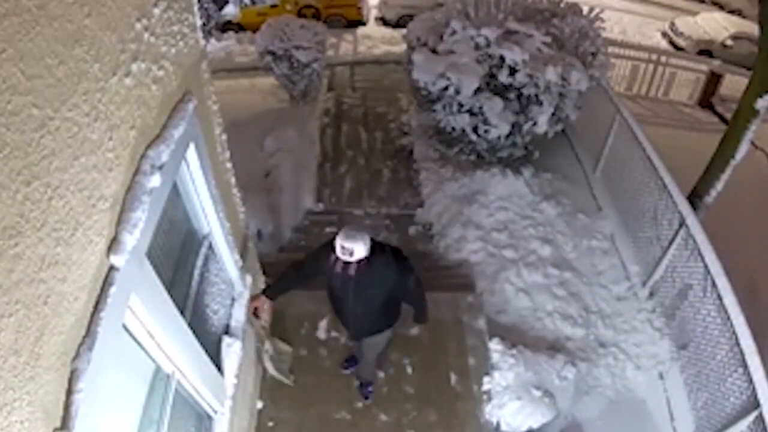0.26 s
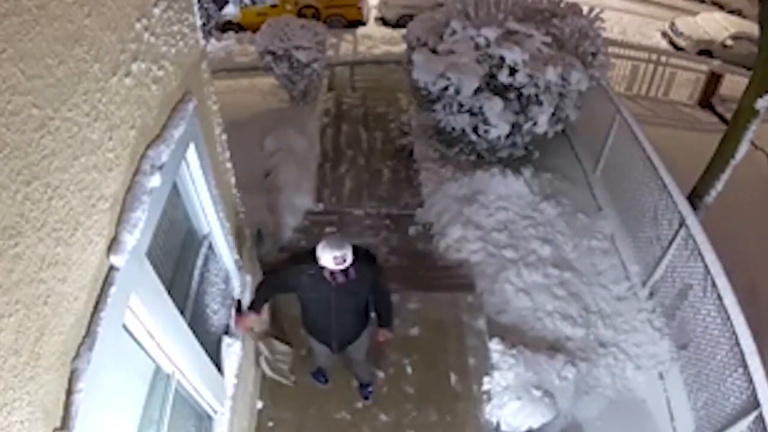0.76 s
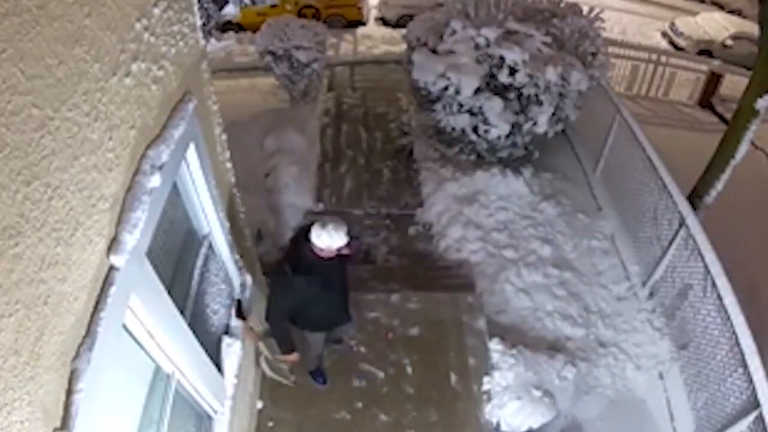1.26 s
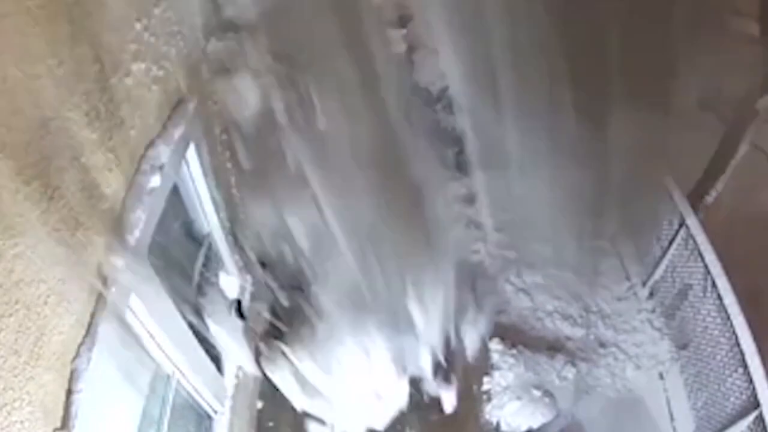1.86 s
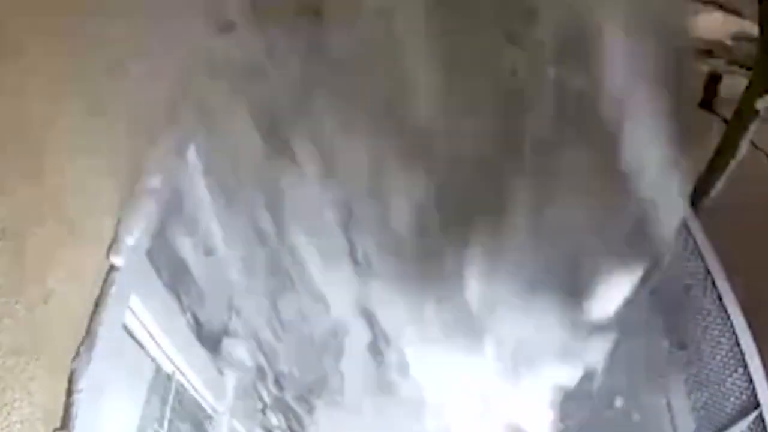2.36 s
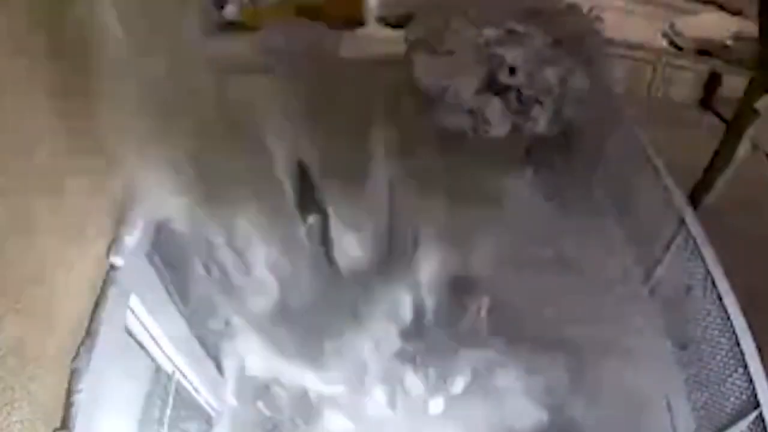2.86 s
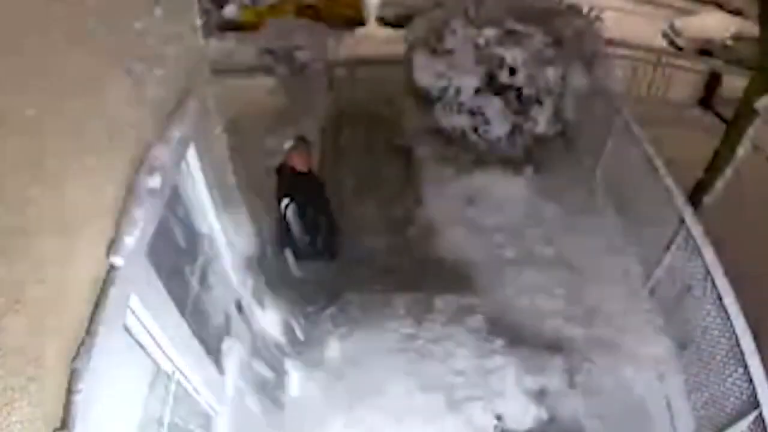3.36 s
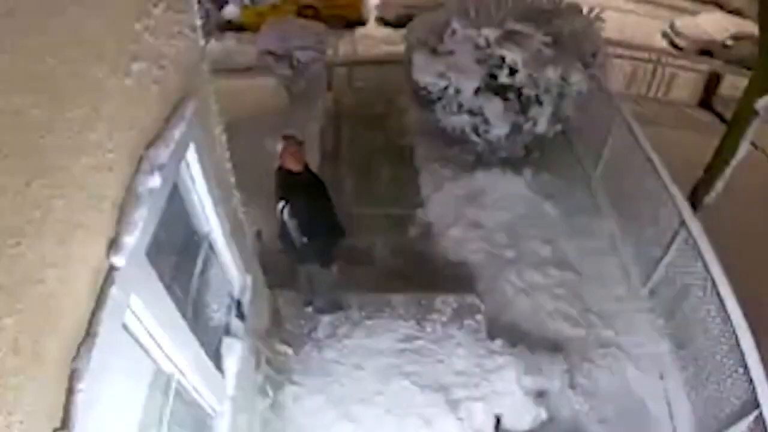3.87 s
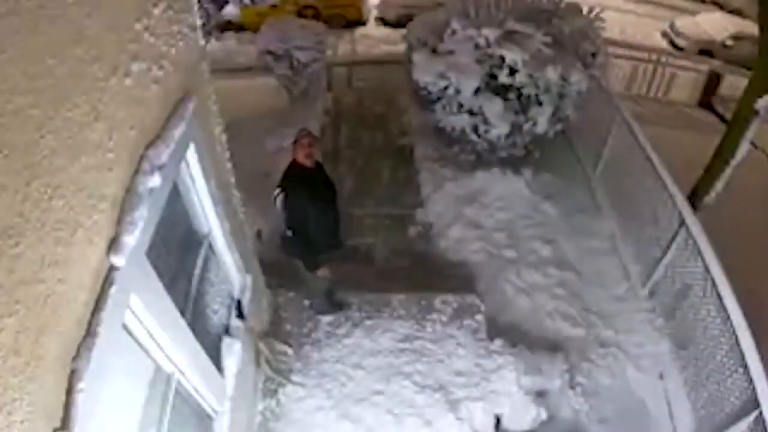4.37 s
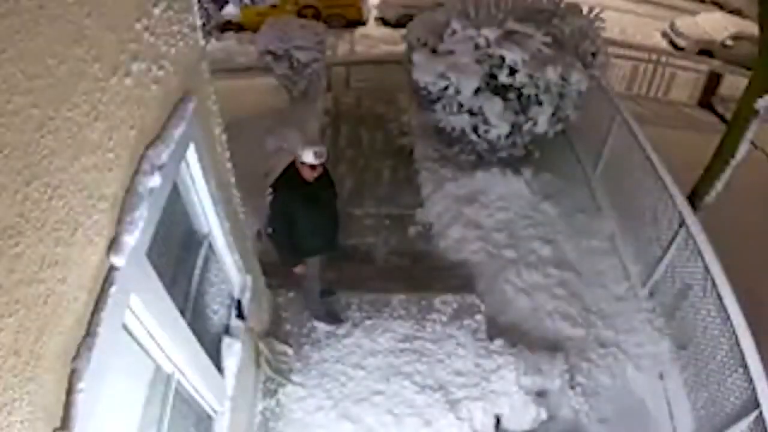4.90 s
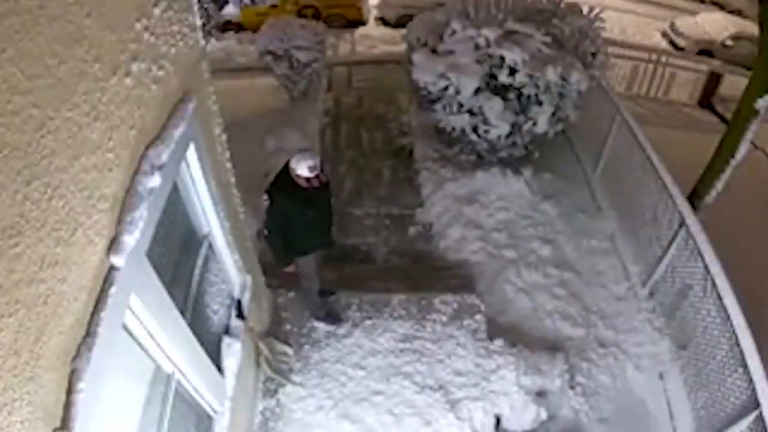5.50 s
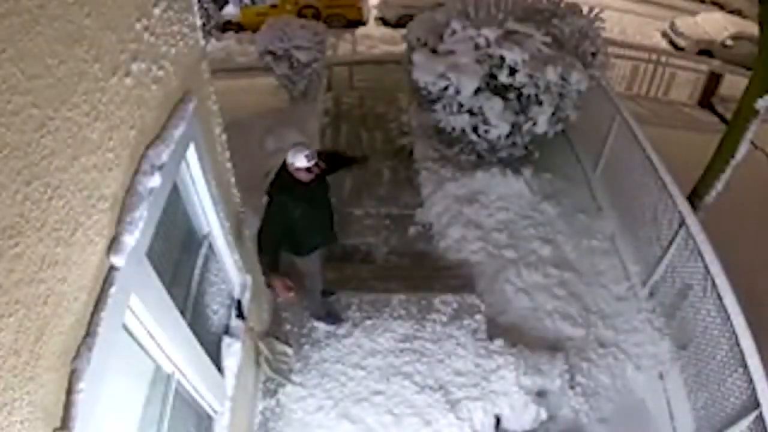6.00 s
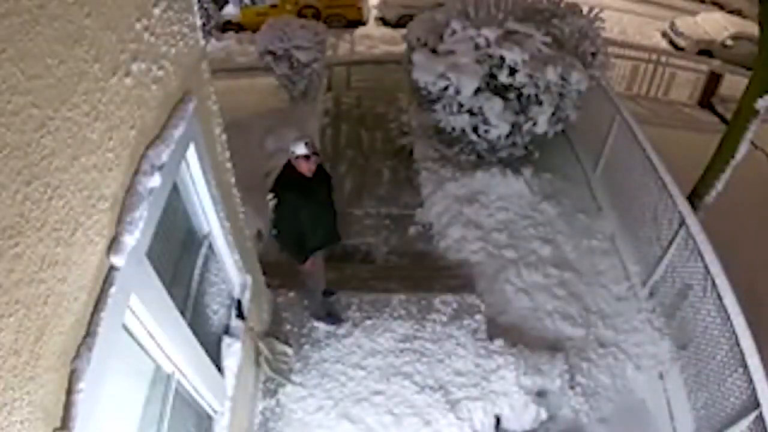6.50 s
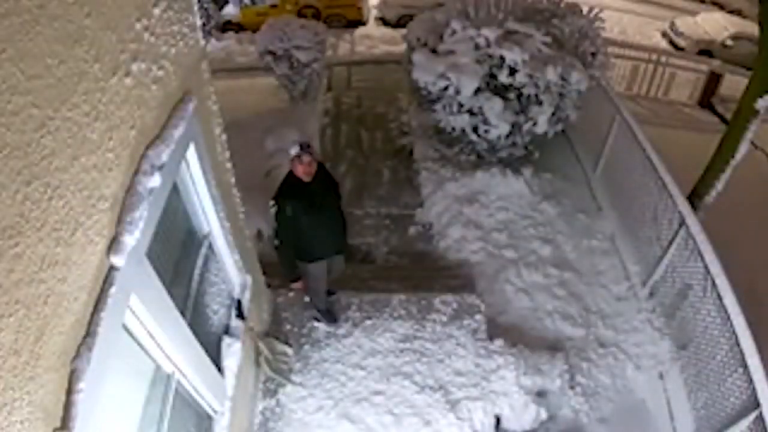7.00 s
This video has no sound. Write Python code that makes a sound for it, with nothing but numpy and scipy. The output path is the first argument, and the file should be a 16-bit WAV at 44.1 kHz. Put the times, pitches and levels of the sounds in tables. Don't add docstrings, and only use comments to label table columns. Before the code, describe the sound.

Hollow knocks and gritty scuffs on a concrete doorstep, drips ticking on metal, then roof snow crashes down in rumbling thuds and hissing powder.

```python
import sys
import numpy as np
from scipy import signal
from scipy.fft import rfft, irfft
from scipy.io import wavfile
from scipy.ndimage import uniform_filter1d

SR = 44100
rng = np.random.default_rng(int(sys.argv[2]) if len(sys.argv) > 2 else 0)


def digitize_waveform(pressure):
    field = np.atleast_2d(pressure).T
    bounded = np.clip(field, -1, 1)
    quanta = np.round(bounded * 32767).astype(np.int16)
    wavfile.write(sys.argv[1], SR, quanta)


def invert_db(x):
    u = np.asarray(x, float) / 20
    return 10 ** u


N = 319725
HIT_N = 6000

# (time [s], level [dB])
SNOW_FLOW = [
    (1.95, -34),
    (2.09, -7),
    (2.22, -2),
    (2.68, 0.5),
    (3.15, -5.5),
    (3.33, -10),
    (3.39, -14.5),
    (3.74, -20),
    (4.15, -23),
]
# (frequency [Hz], level [dB per Hz])
POWDER_COLOUR = [(380, -8), (758, 0.5), (1110, -6), (4320, -12), (7990, -7), (9540, -9), (11000, -22),
                 (14300, -56)]


def unit(x):
    return x / np.sqrt(np.mean(x ** 2))


def colour(x, shape):
    hz, db = np.transpose(shape)
    log_f = np.log(np.fft.rfftfreq(len(x), 1 / SR) + 1)
    curve = invert_db(np.interp(log_f, np.log(hz), db, left=-90, right=-90))
    return unit(irfft(rfft(x) * curve, len(x)))


def patchy(shape, spread_db):
    hz, db = np.transpose(shape)
    fine = np.geomspace(hz[0], hz[-1], num=24)
    smooth = np.interp(np.log(fine), np.log(hz), db)
    return np.transpose([fine, smooth + spread_db * rng.standard_normal(len(fine))])


def band(x, hz, width_hz):
    return signal.lfilter(*signal.iirpeak(hz, hz / width_hz, fs=SR), x)


def resonances(x, modes):
    return sum(invert_db(db) * unit(band(x, hz, width_hz)) for hz, width_hz, db in modes)


def walk(rate):
    k = int(SR / rate)
    steps = np.repeat(rng.standard_normal(N // k + 1), k)
    return 1.3 * uniform_filter1d(uniform_filter1d(steps, k), k)[:N]


def grit(rate, spread_db):
    hits = (rng.random(N) < rate / SR) * invert_db(spread_db * rng.exponential(size=N))
    grains = signal.lfilter([1], [1, -np.exp(-1 / (.002 * SR))], hits)
    return unit((unit(grains) + 1.02) * rng.standard_normal(N))


def fader(table):
    s, db = np.transpose(table)
    gain = np.interp(np.arange(N) / SR, s, invert_db(db), left=0, right=0)
    return uniform_filter1d(gain, size=1500, mode="nearest")


def add(out, s, x):
    i = int(max(s, 0) * SR)
    out[i:i + len(x)] += x[:N - i]


def decay(t60, rise_s):
    t = np.arange(HIT_N) / SR
    return 1000. ** (-t / t60) * (1 - np.exp(-t / rise_s))


def ring(hz, t60, rise_s):
    return np.sin(2 * np.pi * hz * np.arange(HIT_N) / SR) * decay(t60, rise_s)


def burst(t60, rise_s, shape):
    return colour(rng.standard_normal(HIT_N), patchy(shape, 3.2)) * decay(t60, rise_s)


def boot_knocks():
    # (time [s], peak [dB], pitch [Hz], crunch [dB], crunch centre [Hz])
    knock_events = [(.334, -20, 267, -6.5, 2100), (0.344, -21, 297, -7, 6060), (.378, -33.5, 445, -10, 890),
                    (0.417, -45.5, 417, 16.5, 3800), (0.423, -38, 310, 1, 1620),
                    (0.651, -23.5, 295, -10, 2000), (0.67, -31.5, 263, -18, 700),
                    (1.576, -10, 312, -14, 1070), (1.5893, -6.5, 194, -24, 1500),
                    (1.79, -47.5, 634, 0, 2530), (2.016, -31, 228, -20, 2500),
                    (2.027, -40.5, 540, 12, 1110), (2.132, -11.5, 154, -31, 910),
                    (2.139, -40, 565, 5.5, 920), (2.198, -35, 650, -2.5, 850), (3.959, -42, 324, -4, 377),
                    (5.912, -45, 119, -36, 900), (6.5355, -32, 326, 5, 2100), (6.54, -37, 870, -10, 1290),
                    (6.5519, -28, 185, -9, 2900), (6.554, -28, 1310, 6.5, 1140),
                    (6.559, -27, 1537, -24, 990), (6.592, -43, 730, 4, 800), (6.61, -41.5, 700, 1.5, 970)]
    out = np.zeros(N)
    for s, db, hz, crunch_db, crunch_hz in knock_events:
        t60 = .024 if db > -18 else .075 * (hz / 300) ** -0.41
        body = ring(hz, t60, 0.29 / hz)
        rough = 0.2 * burst(t60, 0.0024, [(.5 * hz, -12), (hz, 0), (3 * hz, -10)])
        overtone = 0.42 * ring(1.55 * hz, .8 * t60, 0.0047)
        ice = [(0.351 * crunch_hz, -12), (crunch_hz, 0), (min(1.97 * crunch_hz, 8000), -9),
               (9000, -11), (11500, -18)]
        crunch = invert_db(crunch_db - 1.5) * burst(0.035, .0025, ice)
        add(out, s, invert_db(db) * (crunch - (body + rough + overtone)))
    return out


def boot_scuffs():
    # (time of most pressure [s], length [s], level [dB], squeak [dB])
    scuff_events = [(-0.007, 0.08, -49, -20), (0.065, 0.1, -74, -13), (.12, 0.14, -57, -37),
                    (0.217, 0.042, -56, -39), (0.324, 0.1, -47, -24), (0.344, 0.048, -38, -38),
                    (0.388, 0.094, -51, -13), (0.413, 0.24, -51.5, -17), (.76, 0.11, -46, -42),
                    (1.033, 0.073, -49.5, -14), (1.524, 0.018, -50.5, -16), (1.618, 0.12, -51.5, -7.5),
                    (1.825, 0.25, -63, -39), (2.025, 0.028, -50, -7), (2.082, 0.022, -57.5, -10),
                    (3.086, 0.16, -59.5, -1), (3.87, 0.22, -69.5, -4), (4.063, 0.16, -66.5, -7),
                    (4.23, 0.17, -59.5, -11.5), (4.58, 0.24, -68, -11), (4.694, 0.098, -64, 0.5),
                    (4.746, 0.094, -67.5, -8), (6.148, 0.25, -72, -12), (6.578, 0.13, -56, 0.5),
                    (6.68, 0.11, -75.5, 11), (6.721, 0.033, -63.5, -17), (6.926, 0.06, -60.5, 2.5)]
    # (frequency [Hz], width [Hz], level [dB])
    rubber_modes = [(1430, 200, 0), (3100, 600, -3)]
    out, sand = np.zeros(N), grit(660, 1.1)
    for peak_s, length, db, squeak_db in scuff_events:
        s = max(peak_s - 0.46 * length, 0)
        grains = sand[int(s * SR):][:int(length * SR)]
        peak_share = np.clip((peak_s - s) / length, .02, .98)
        along = np.linspace(0, 1, len(grains))
        pressure = np.interp(along, [0, peak_share, 1], [.03, 1, .06]) ** 0.98
        hz = min(3800 * 2 ** (-.035 * squeak_db), 8500)
        drag_shape = [(400, -12), (1200, -5), (hz, 0), (9000, -5), (11500, -14)]
        drag = colour(grains, patchy(drag_shape, 0.55))
        squeak = invert_db(squeak_db) * resonances(grains, rubber_modes)
        add(out, s, invert_db(db) * pressure * (drag + squeak))
    return out


def blade():
    # (frequency [Hz], level [dB], t60 [s])
    blade_modes = [(1393, -48.5, 0.44), (1500, -55, 0.63)]
    t = np.arange(N) / SR
    out = np.zeros(N)
    for hz, db, t60 in blade_modes:
        level = invert_db(db + 3.2 * walk(52))
        phase_wobble = 1.8 * walk(54.4)
        out += level * np.sin(2 * np.pi * hz * t + phase_wobble) * 1000. ** (-t / t60)
    return out


def drips():
    # (time [s], peak [dB], low ring [dB], middle ring [dB], bright crack [dB])
    drop_events = [
        (0.7459, -21.5, -24.5, -23, -8.5),
        (1.567, -17.5, -17.5, -26, -11.5),
        (2.366, -27.5, -22, -21, -18),
        (3.184, -29, -39, -43, -16.5),
        (3.989, -26.5, -38, -65, -15),
        (4.7906, -18.5, -37.5, -35, -19.5),
        (5.601, -19.5, -36.5, -31, -17),
        (6.4096, -26.5, -25.5, -31, -12),
        (7.209, -21, -28, -40, -14),
    ]
    # (frequency [Hz], level [dB], t60 [s])
    sheet_modes = [(446, -11, 0.1), (745, -5.5, 0.27), (1537, 0.5, 0.04), (2282, -9, 0.077),
                   (3100, -21.5, 0.042), (3290, -20, 0.042), (3506, -9, 0.018)]
    out = np.zeros(N)
    for s, db, low_db, middle_db, crack_db in drop_events:
        body = np.zeros(HIT_N)
        for hz, mode_db, t60 in sheet_modes:
            spot, detune = rng.standard_normal(2)
            push_db = low_db + 14.5 if hz < 1000 else middle_db + 15 if hz < 2700 else 0
            mode = ring(hz * (1 + 0.02 * detune), min(0.68 * t60, .07), .0001)
            body += invert_db(mode_db + 2.0 * spot + push_db) * mode
        splat = invert_db(low_db + 3) * burst(0.16, 0.0024, [(500, -14), (710, 2), (950, -15)])
        crack_shape = [(1000, -24), (4000, -9), (8200, 19), (11500, -5)]
        crack = invert_db(crack_db + 6.5) * burst(0.013, .0001, crack_shape)
        splash_shape = [(500, -36), (1600, 25), (3500, 23), (10000, 18)]
        splash = invert_db(-16.5) * burst(0.054, 0.00033, splash_shape)
        add(out, s, invert_db(db - 5) * (body + crack + splash + splat))
    return out


def crumbs():
    # (time [s], peak [dB], pitch [Hz], narrow ring [dB])
    tick_events = [(1.5868, -23, 2570, -13), (2.0088, -31.5, 3880, -7), (2.0298, -29, 3800, -9),
                   (2.079, -49, 860, 14), (4.052, -37, 2300, -4), (4.8468, -41, 3300, -14),
                   (4.9018, -46.5, 3580, -7), (4.9104, -47.5, 2410, -6), (4.946, -46, 5290, -10),
                   (5.3323, -51, 3460, -6), (5.5054, -41.5, 4020, 6.5), (5.665, -38.5, 2230, -4),
                   (5.695, -45, 3480, -4), (5.7067, -44, 2230, -8), (5.7154, -43, 3520, -8),
                   (5.7594, -53, 2120, -12), (5.986, -48.5, 3730, -7), (6.3425, -51, 2090, -6),
                   (6.4617, -49, 5570, -8), (6.4755, -42, 8100, -4), (6.6818, -53.5, 2380, 13),
                   (6.91, -38, 3250, -14), (7.0344, -48.5, 8150, 0)]
    out = np.zeros(N)
    for s, db, hz, ring_db in tick_events:
        snap = burst(0.018, 0.00021, [(1500, 3), (8000, 12), (11500, 3)])
        narrow = burst(0.053, 0.001, [(0.76 * hz, -16), (hz, 0), (1.45 * hz, -16)])
        add(out, s, invert_db(db - 12.5) * (snap + invert_db(ring_db) * narrow))
    return out


def flow_db(s):
    return np.interp(s, *np.transpose(SNOW_FLOW))


def small_lumps():
    s = np.arange(2.19, 3.42, 1 / 24)
    late, strong, high = rng.standard_normal((3, len(s)))
    s = s + .012 * late
    db = -29.5 + 0.39 * flow_db(s) - 0.5 * strong
    hz = 129 * 2 ** (0.54 * high)
    return list(zip(s, db, hz))


def lumps():
    # (time of impact [s], peak [dB], pitch [Hz])
    lump_events = [(2.0313, -18, 239), (2.1457, -15.5, 251), (2.205, -23.5, 128), (2.278, -25, 111),
                   (2.299, -28.5, 125), (2.3669, -17, 134), (2.4037, -27, 121), (2.4443, -15, 113.5),
                   (2.463, -25, 104), (2.528, -18, 196), (2.551, -19.5, 88), (2.5666, -23, 132),
                   (2.6354, -22, 109), (2.656, -23.5, 134), (2.7222, -22.5, 111), (2.7881, -23, 100),
                   (2.8082, -32, 87), (2.8855, -19.5, 189), (2.912, -24.5, 115), (2.9764, -21.5, 93),
                   (3.0094, -20.5, 206), (3.032, -15.5, 128), (3.0618, -17, 129), (3.078, -22.5, 115),
                   (3.1146, -32.5, 109), (3.1383, -27.8, 91.5), (3.1864, -30, 88.5), (3.252, -17.5, 142),
                   (3.3012, -18.5, 125), (3.3152, -20.5, 107),
                   (3.3668, -25.5, 173),
        (3.4633, -31, 240),
        (3.5052, -29, 185),
        (3.5583, -36.5, 270),
        (3.6505, -34.5, 120),
        (3.7059, -38, 260),
        (3.766, -30.5, 110),
        (3.9506, -22.5, 140),
        (3.4788, -28, 107),
        (2.6, -30, 178),
    ]
    crush_shape = [(150, 12.5), (330, 22.0), (500, 3.5), (750, -19.5), (1500, -5), (3000, -103)]
    out, lead = np.zeros(N), 1000
    t = (np.arange(HIT_N) - lead) / SR
    for s, db, hz in lump_events + small_lumps():
        turns = t * hz
        before = np.exp(-(turns / .5) ** 2)
        after = 0.95 * np.exp(-(turns / 0.52) ** 2) + 0.18 * np.exp(-np.abs(turns) / 2.2)
        swell = np.where(turns < 0, before, after)
        thud = -np.sin(2 * np.pi * turns * (1 - 0.11 * np.tanh(turns))) * swell
        heave = np.sin(2 * np.pi * 57.7 * t) * np.exp(-(t / 0.017) ** 2)
        ground = invert_db(-8.5) * (110 / hz) ** 2 * heave
        crush = invert_db(-14.0) * swell * colour(rng.standard_normal(HIT_N), crush_shape)
        add(out, s - lead / SR, invert_db(db + 1.5) * (thud + crush + ground))
        puff_db = -44 + 0.58 * (db + 30) + 0.33 * flow_db(s) + 2.5 * rng.standard_normal()
        add(out, s - .006, invert_db(puff_db) * burst(0.076, 0.0086, POWDER_COLOUR))
    return out


def fall():
    # (frequency [Hz], level [dB per Hz])
    rumble_colour = [(15, -56), (25, 2), (54, 6), (123, -3.5), (321, -3), (520, -15.5), (700, -33.5),
                     (1950, -57)]
    flow = fader(SNOW_FLOW)
    hiss_level = invert_db(-47.5) * flow
    trailing = np.roll(flow, int(0.063 * SR))
    rumble_level = invert_db(-26) * np.abs(trailing) ** 1.16
    gusts, roll = invert_db(1.5 * walk(30) - 3), invert_db(1.5 * walk(25) - 11)
    hiss = hiss_level * gusts * colour(grit(700, 2.3), POWDER_COLOUR)
    rumble = rumble_level * roll * colour(rng.standard_normal(N), rumble_colour)
    return hiss + rumble


def slide():
    # (time [s], level [dB])
    drag_levels = [
        (.7, -57.5),
        (.83, -62),
        (1.122, -59),
        (1.426, -59),
        (1.6, -60),
    ]
    # (frequency [Hz], width [Hz], level [dB])
    panel_modes = [(724, 46, 0), (990, 78, -5), (1280, 100, -11), (2690, 240, -14), (3580, 690, -10.5),
                   (5100, 150, -22)]
    # (frequency [Hz], level [dB per Hz])
    scrape_colour = [(180, -41), (300, -5), (719, -10.5), (1180, -28), (1310, -16), (8770, -20),
                     (11000, -34), (14300, -65)]
    scrape = fader(drag_levels)
    sliding_s = np.clip(np.arange(N) / SR - drag_levels[0][0], 0, 1)
    rumble = scrape * invert_db(4.5 + 8.5 * sliding_s)
    sand = grit(1200, 1.5)
    flutter, roll = invert_db(1.2 * walk(25)), invert_db(1.2 * walk(15))
    panels = invert_db(-0.5) * unit(resonances(sand, panel_modes))
    rasp = panels + invert_db(3.0) * colour(sand, scrape_colour)
    low_shape = [(30, -10), (60, 1.0), (150, 1.5), (400, -27.0), (600, -40)]
    low = colour(rng.standard_normal(N), low_shape)
    return scrape * flutter * rasp + rumble * roll * low


def air():
    # (time [s], level [dB])
    traffic_levels = [
        (0, -49.5),
        (.3, -49.5),
        (1.6, -51.5),
        (1.9, -56),
        (3.9, -60.5),
        (5, -58.5),
        (6.4, -57.5),
        (7.25, -54.5),
    ]
    # (frequency [Hz], level [dB per Hz])
    bass_colour = [(12, -52), (20, -0.5), (49, -3), (114, -16), (156, -11), (338, -24.5), (700, -58),
                   (1000, -63)]
    # (frequency [Hz], level [dB per Hz])
    hiss_colour = [(180, -46), (300, -4.5), (446, -4.5), (726, -6), (1650, -11), (6630, -18), (11500, -22),
                   (14900, -58)]
    level = fader(traffic_levels)
    sway, flicker = invert_db(1.2 * walk(8)), invert_db(.7 * walk(12))
    bass = sway * colour(rng.standard_normal(N), bass_colour)
    hiss = invert_db(-10) * flicker * colour(rng.standard_normal(N), hiss_colour)
    return level * (bass + hiss)


def wall_slap(near):
    t = np.arange(5000) / SR
    wall = invert_db(-42) * rng.standard_normal(5000) * 1000. ** (-t / .07) * (t > .004)
    return signal.fftconvolve(near, wall)[:N]


def scene():
    near = boot_knocks() + boot_scuffs() + drips() + crumbs() + lumps()
    mix = near + wall_slap(near) + blade() + fall() + slide() + air()
    return mix[None]


def low_pass(x):
    return signal.sosfilt(signal.butter(12, 11620, fs=SR, output="sos"), x)


def record(dry):
    thin = signal.sosfilt(signal.butter(2, 38, "high", fs=SR, output="sos"), dry)
    ceiling = 0.15
    held = ceiling * np.tanh(thin / ceiling)
    dull = signal.sosfilt(signal.butter(5, 9040, fs=SR, output="sos"), held)
    cut = signal.sosfilt(signal.ellip(8, .5, 40, 11500, fs=SR, output="sos"), dull)
    return low_pass(cut + .0006)


dry = scene()
out = record(dry)
digitize_waveform(out)
```